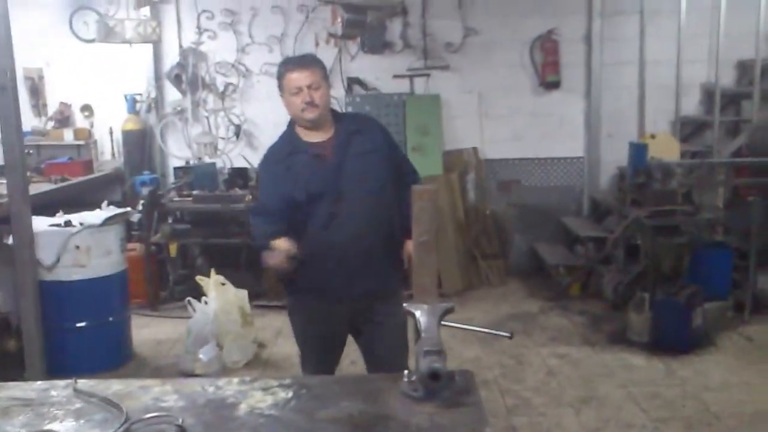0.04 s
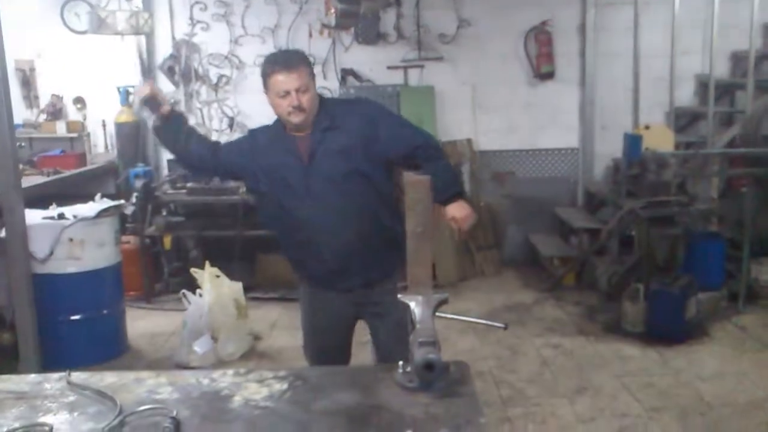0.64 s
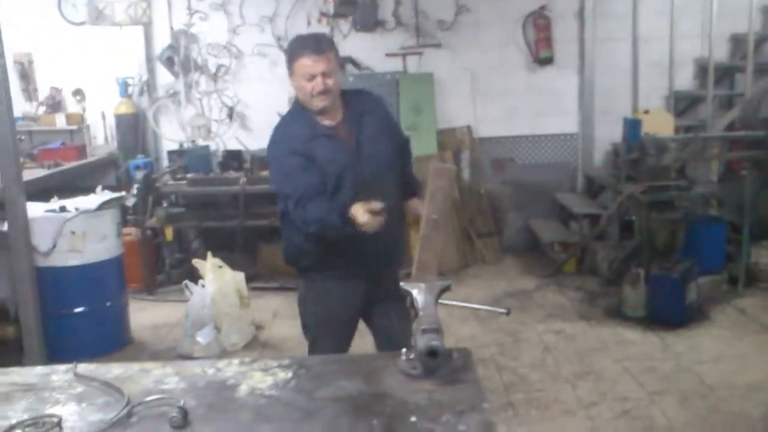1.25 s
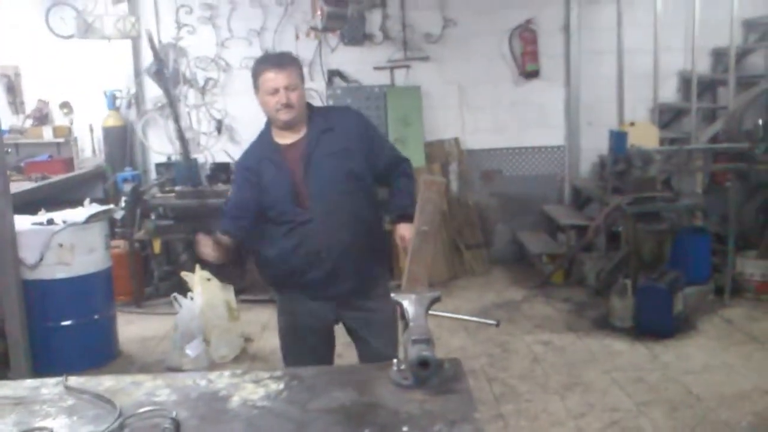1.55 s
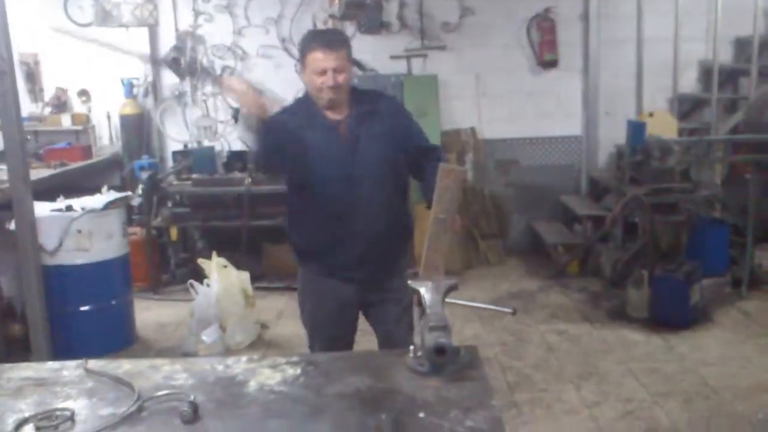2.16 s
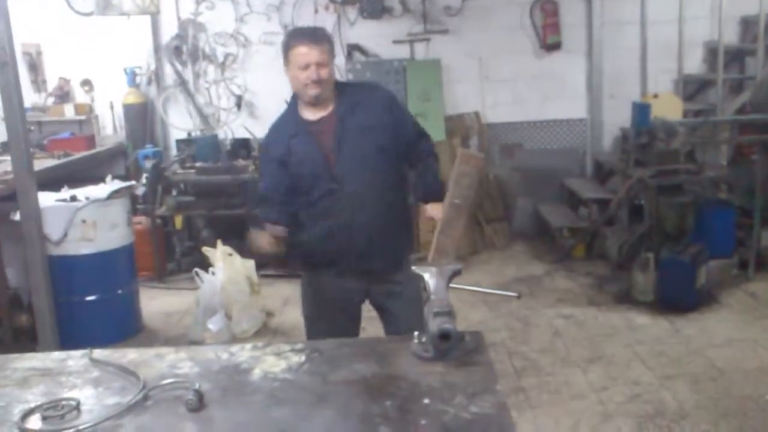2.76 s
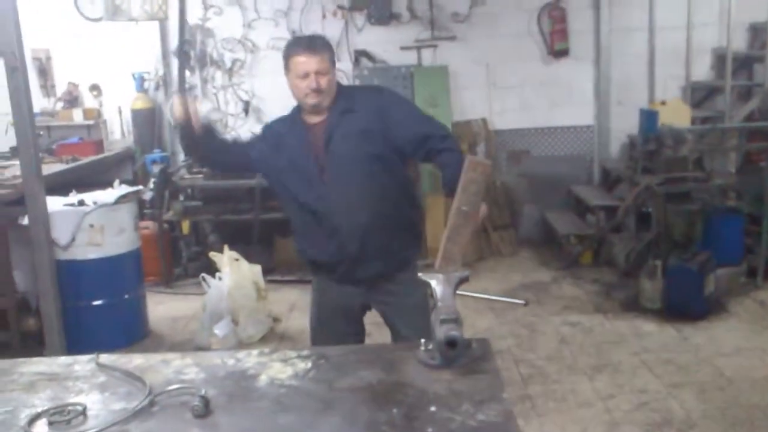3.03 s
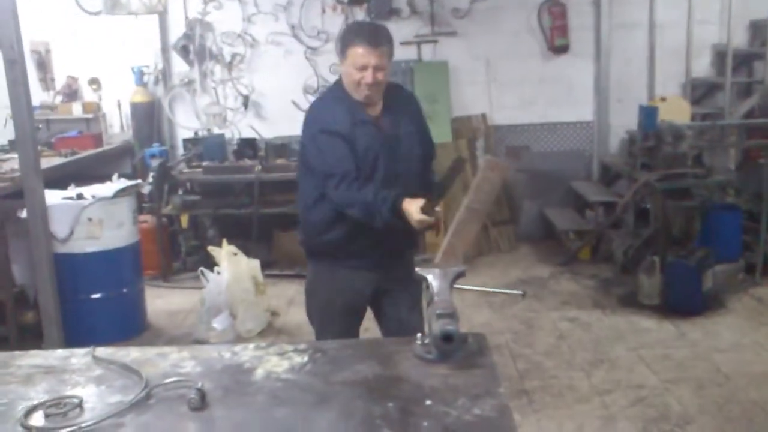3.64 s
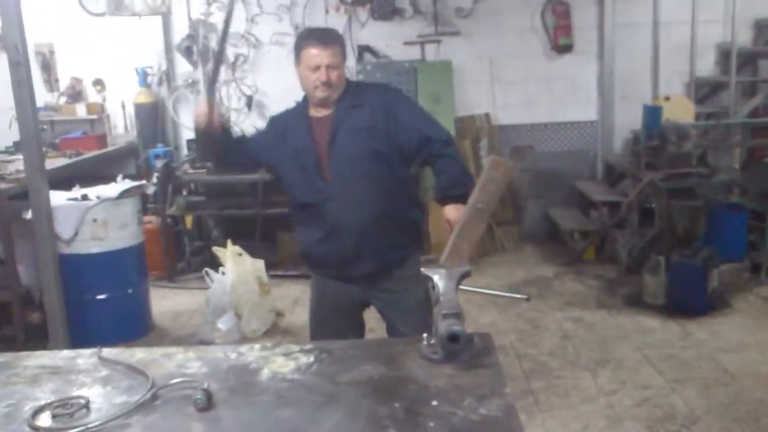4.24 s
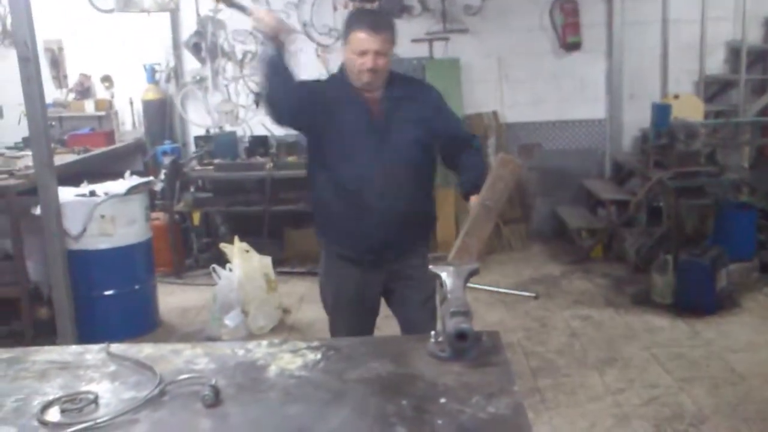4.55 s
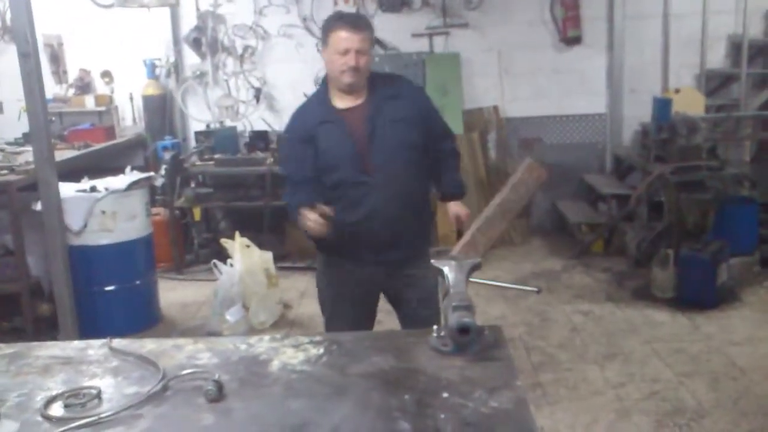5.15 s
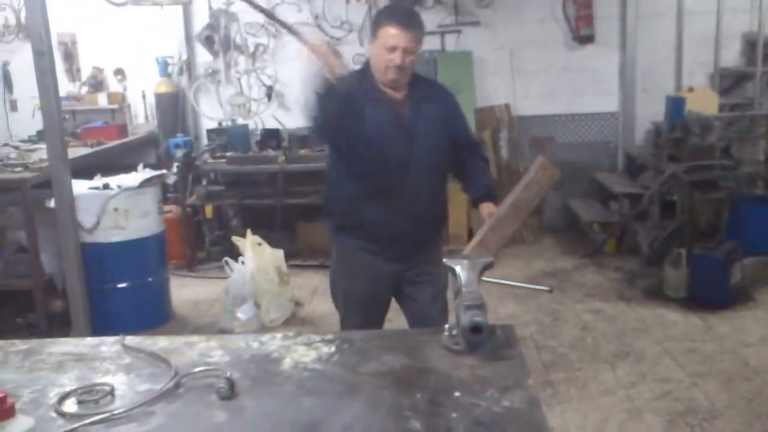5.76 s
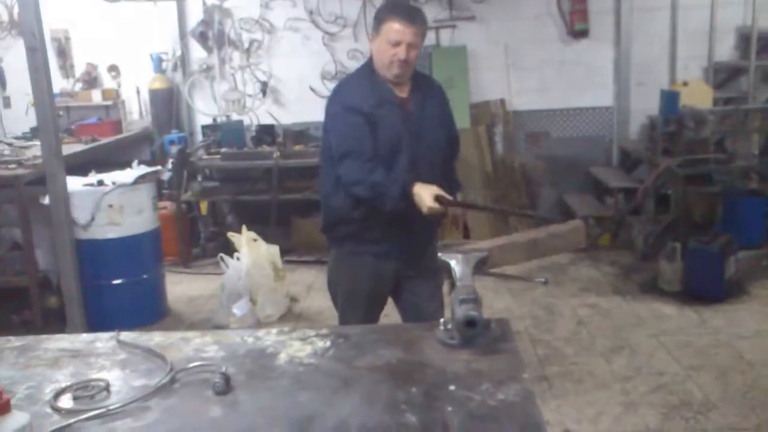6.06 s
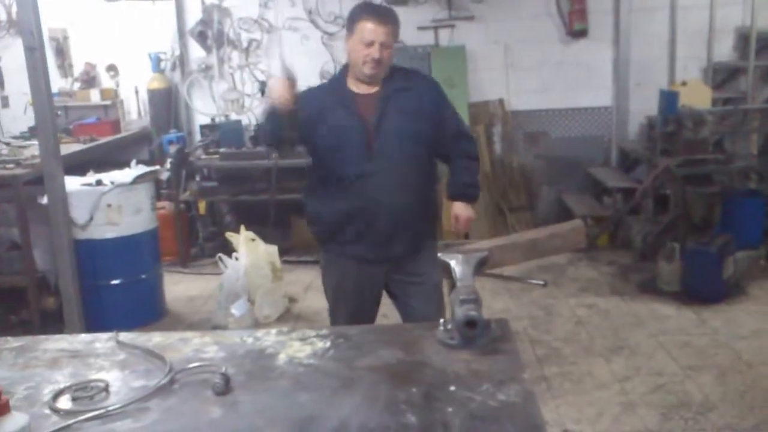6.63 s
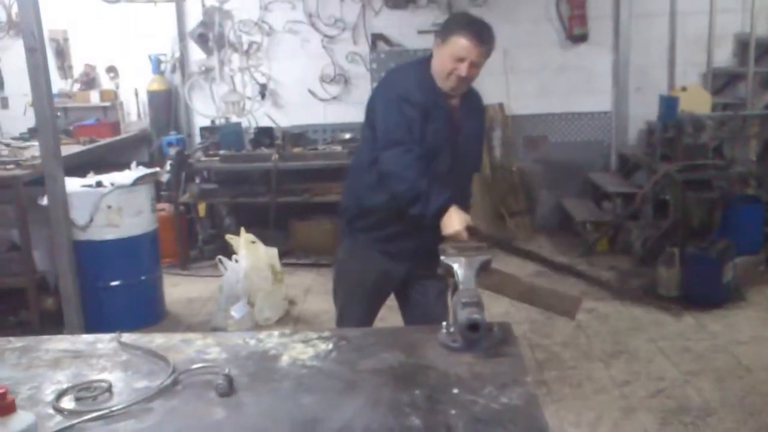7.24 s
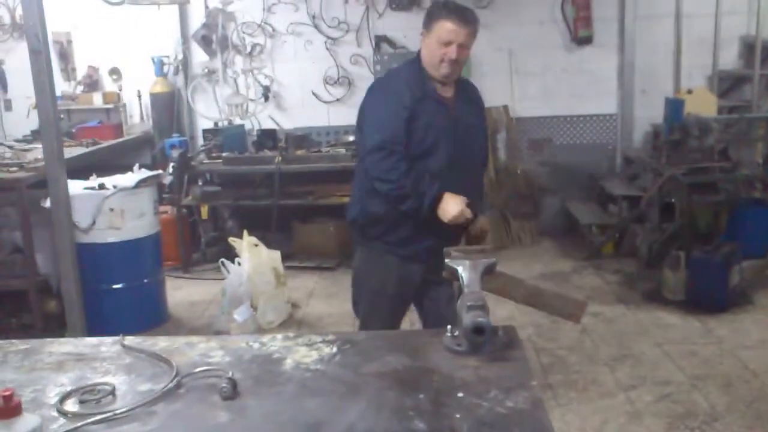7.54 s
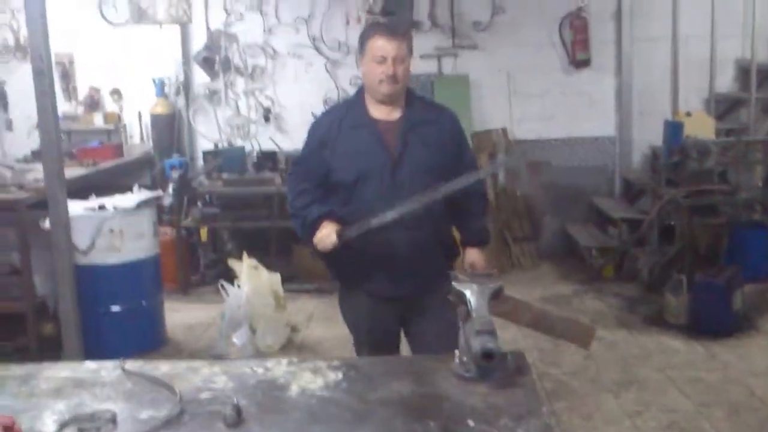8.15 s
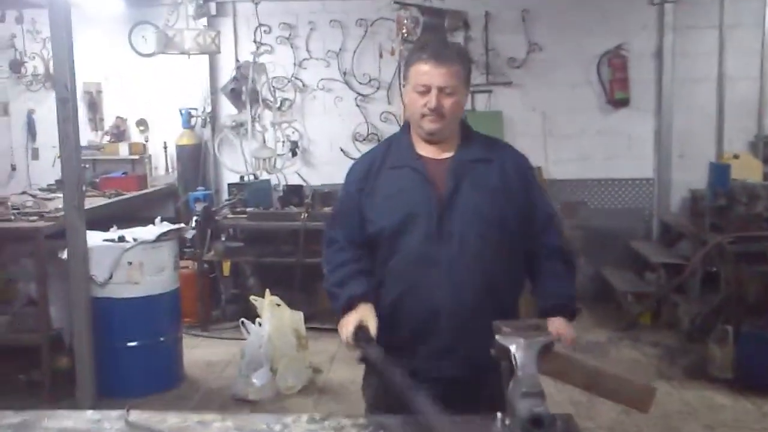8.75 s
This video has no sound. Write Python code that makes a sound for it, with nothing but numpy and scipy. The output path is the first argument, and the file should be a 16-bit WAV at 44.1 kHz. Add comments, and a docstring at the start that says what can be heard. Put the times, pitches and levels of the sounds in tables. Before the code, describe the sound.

A steel sword strikes a target in a bench vise six times, a little over a second apart. Each blow is a loud, distorted crack with a metallic clang, and a clear blade note rings on or is quickly damped. A sleeve rustles faintly before each swing, and two dull knocks follow the third hit. A machine hums throughout the echoing workshop, heard from some distance.

```python
"""A steel sword strikes a target in a bench vise six times, in a hard-walled workshop.
Each blow cracks and sets the steel ringing; one clear note of the blade sings on until it is damped.
A sleeve rustles before each swing, the sword knocks twice in the hand, and a machine hums throughout.
Two microphones stand 12.5 cm apart, far enough off that the room outweighs the direct sound.
They overload on every hit, then their gain control briefly holds the echo level."""
import sys
import numpy as np
from scipy import signal
from scipy.fft import rfft, irfft, next_fast_len
from scipy.io import wavfile
from scipy.ndimage import uniform_filter1d

SR = 44100
rng = np.random.default_rng(int(sys.argv[2]) if len(sys.argv) > 2 else 0)


def persist_wave(psi):
    """Save psi, clipped to +-1, as 16-bit WAV."""
    counts = np.round(np.clip(psi, -1, 1) * 32767).astype(np.int16)
    wavfile.write(sys.argv[1], SR, np.atleast_2d(counts).T)


N = 387771
TIME = np.arange(N) / SR
TAIL = TIME[:SR * 3 // 2]   # time axis of one blow or echo


def from_db(db):
    """Decibels to gain."""
    return 10 ** (np.asarray(db) / 20)


def rms_one(x):
    """Scale to rms 1."""
    return x / np.sqrt(np.mean(x ** 2) + 1e-20)


def at_hz(points, hz):
    """Read a table on a log-frequency axis."""
    freqs, values = np.transpose(points)
    return np.interp(np.log(np.maximum(hz, 1)), np.log(freqs), values)


def fade(t, t60):
    """Exponential decay, 60 dB down after t60."""
    return np.exp(-np.log(1000) * t / t60)


def add(out, start_s, sound):
    """Mix a sound in at its start time."""
    at = int(start_s * SR)
    out[:, at:at + sound.shape[-1]] += sound[..., :N - at]


def drift(rate_hz):
    """A random wander of rms 1."""
    knots = rng.standard_normal(4000)
    return rms_one(np.interp(TIME * rate_hz, np.arange(len(knots)), knots))


def causal(gain):
    """The minimum-phase pulse that has this gain at each frequency."""
    cepstrum = irfft(np.log(gain + 1e-9))
    cepstrum[1:len(cepstrum) // 2] *= 2
    cepstrum[len(cepstrum) // 2 + 1:] = 0
    return irfft(np.exp(rfft(cepstrum)))


def diffuse_spectrum(size, mic_spacing_m=0.125):
    """White noise from all sides, as a spectrum with its frequencies; long waves reach both mics alike."""
    hz = np.fft.rfftfreq(size, 1 / SR)
    wavelengths_apart = hz * mic_spacing_m / 343
    alike = np.sinc(2 * wavelengths_apart)
    mid, side = rfft(rng.standard_normal((2, size)))
    return (np.sqrt(1 + alike) * mid + np.sqrt(1 - alike) * side * [[1], [-1]]) / np.sqrt(2), hz


def diffuse_noise(colour):
    """Noise at the microphone pair, shaped by a spectrum table, at rms 1."""
    spectrum, hz = diffuse_spectrum(next_fast_len(N, True))
    return rms_one(irfft(spectrum * from_db(at_hz(colour, hz)))[:, :N])


# air all round the microphones: (frequency [Hz], relative density [dB])
AIR_SPECTRUM = [(15, -32.5), (25, -6.5), (90, -10), (163, -3), (293, -5.5), (354, -3.5), (462, -13),
                (529, -11), (673, -11.5), (729, -8.5), (2130, -14), (2850, -23.5), (5720, -30),
                (13800, -51), (15000, -76)]
# the machine's hum at the right microphone: (frequency [Hz], rms level [dB])
HUM_LINES = [(70, -59), (138, -55), (184, -55), (208, -58.5), (332, -55.5), (371.2, -54.5), (554.5, -61.5),
             (742.9, -62.5), (926, -70)]
def room_tone(air_db=-45.05, waver_db=1.5, wander_rad=0.91, left_db=-1.0):
    """Rushing air and the unsteady hum of a machine fill the workshop."""
    air = from_db(air_db) * diffuse_noise(AIR_SPECTRUM)
    hum = 0
    for hz, level_db in HUM_LINES:
        tone = np.sin(2 * np.pi * hz * TIME + wander_rad * drift(6.2))
        hum += from_db(level_db) * rms_one(tone * from_db(waver_db * drift(3.9)))
    return (air + hum) * from_db([[left_db], [0]])


# rubbing cloth, faint at the microphones: (frequency [Hz], relative density [dB])
CLOTH_SPECTRUM = [(800, -13), (2500, 3), (5000, 4.5), (9000, -7), (14500, -14), (16000, -35)]
def sleeve(lead_s=0.31, raise_s=0.44, raise_db=-63.5, flutter_db=2.0, flutter_hz=25):
    """Cloth rubs in a soft swell as the arm goes up for each blow, and as it is lowered at the end."""
    rub = diffuse_noise(CLOTH_SPECTRUM)
    moves = [(blow[0] - lead_s, raise_s, raise_db) for blow in SWORD_BLOWS]
    moves.append((8.49, 0.24, -57.5))   # lowering the sword
    swell = 0
    for peak_s, length_s, level_db in moves:
        swell += from_db(level_db) * np.cos(np.pi * np.clip((TIME - peak_s) / length_s, -.5, .5))
    return rub * swell * from_db(flutter_db * drift(flutter_hz))


# the crack at the point of contact: (frequency [Hz], relative density [dB])
CRACK_SPECTRUM = [(25, -11), (65, -0.5), (105, -8), (260, -5), (500, -7.5), (700, -6.5), (1050, -5.5),
                  (1500, 1.5), (2400, 0.5), (4500, 1), (7000, 1.5), (8200, -3), (11000, -8), (15500, -7)]
def crack(thud_db, bright_db, thud_hz=500, bright_hz=4500):
    """The contact pulse: the bench takes up the lows, a hard edge adds treble."""
    hz = np.fft.rfftfreq(len(TAIL), 1 / SR)
    plain = rms_one(from_db(at_hz(CRACK_SPECTRUM, hz)))
    bass_db = thud_db / (1 + (hz / thud_hz) ** 2)
    treble_db = bright_db * hz ** 2 / (hz ** 2 + bright_hz ** 2)
    return causal(plain * from_db(bass_db + treble_db))


# blade, target and vise ringing at the bench: (frequency [Hz], relative energy [dB], t60 [s])
STEEL_MODES = [(795, -26, .05), (1406, -14, .14), (1598, -33, 1.1), (1870, -12, .07), (1925, -9, .07),
               (1960, -11, .09), (2170, -20, .05), (2255, -17, .06), (2305, -14, .12), (2415, -16, .08),
               (2500, -20, .06), (2625, -15, .08), (2860, -23, .05), (3136, -17, .12), (3270, -20, .05),
               (3340, -18, .08), (3745, -20, .2), (3818, -18, .25), (4030, -24, .06), (4172, -21, .2),
               (4470, -22, .05), (4897, -20, .12), (5342, -18, .06), (5462, -18, .08), (5730, -17, .15),
               (6120, -22, .06), (6750, -19, .04), (6860, -21, .15), (9517, -36, .5), (10520, -35, .4)]
def clang(ring_db=-2.0, scatter_db=0.84):
    """Every blow rings the modes of the steel, each at a slightly different strength."""
    out = 0
    for hz, level_db, t60 in STEEL_MODES:
        mode = np.sin(2 * np.pi * (hz * TAIL + rng.random())) * fade(TAIL, t60)
        out += mode / np.linalg.norm(mode) * from_db(level_db + scatter_db * rng.standard_normal())
    return out * from_db(ring_db)


# groups of modes that a blow lifts or mutes, by its place along the edge:
# (centre [Hz], width [Hz], lift at place 0 [dB], lift at place 1 [dB], lift per extra force [dB/dB])
MODE_GROUPS = [(790, 180, -3.5, 4, -0.66), (1598, 50, 5, -6, -0.35), (1916, 160, 7, -1, -0.1),
               (2435, 390, 0, 7.5, -0.3), (3400, 340, 4.5, -1.6, -0.22)]
def point_of_impact(sound, place, extra_db, overtone_hz, overtone_db, overtone_width_hz=60):
    """Where the edge lands favours one overtone; place and force shift whole groups of modes."""
    hz = np.fft.rfftfreq(len(sound), 1 / SR)
    lift_db = overtone_db * np.exp(-((hz - overtone_hz) / overtone_width_hz) ** 2)
    for centre, width, first_db, last_db, per_force in MODE_GROUPS:
        group_db = first_db + (last_db - first_db) * place + per_force * extra_db
        lift_db += group_db * np.exp(-((hz - centre) / width) ** 2)
    return irfft(rfft(sound) * rfft(causal(from_db(lift_db))))


# the echo off the hard walls: (frequency [Hz], t60 [s])
ECHO_DECAY = [(60, 0.62), (250, 0.85), (1000, 0.65), (2500, 0.63), (5000, 0.58), (8000, 0.46),
              (11000, 0.38), (16000, 0.1)]
# its balance at the microphones: (frequency [Hz], left over right [dB])
ECHO_BALANCE = [(600, 0.8), (1300, -1.5), (2300, -1.2), (4400, 0), (8100, 4), (14000, 10.5)]
def workshop(sound, direct_db=18.0, early_db=6.0, early_t60=0.056):
    """Direct sound and bench echoes reach both microphones alike; the diffuse tail dulls as it dies."""
    noise = irfft(diffuse_spectrum(len(TAIL))[0], len(TAIL))
    hz, t, cells = signal.stft(noise, SR, nperseg=256)
    decay = fade(t, at_hz(ECHO_DECAY, hz)[:, None])
    sides = from_db(at_hz(ECHO_BALANCE, hz) * [[1], [-1]] / 2)
    tail = signal.istft(cells * decay * sides[..., None], SR)[1]
    early = from_db(early_db) * rng.standard_normal(len(TAIL)) * fade(TAIL, early_t60)
    early[0] += from_db(direct_db)
    return signal.fftconvolve(early + tail[:, :len(TAIL)], sound[None], axes=1)


# blows at the vise: (time [s], force [dB], brightness [dB], place on the edge [0-1], overtone [Hz],
# overtone lift [dB], clear note's level [dB], its left over right [dB], its free ringing [s])
SWORD_BLOWS = [(1.0205, 9, -4, 0.03, 3360, 3.5, -16.5, 0.5, 1.3),
               (2.3478, 2.5, 0, 0.65, 5760, 6, -23, -12, 2.6),
               (3.5712, 9.5, 3.8, 0.45, 3790, 4, -19.5, 4.5, 0.06),
               (4.7720, 9.5, 1.9, 0.6, 6820, 2, -11.5, -4, 0.038),
               (5.9422, 4.5, 4, 0.73, 5430, 9, -19, -2, 1.024),
               (7.1828, 8.5, -3.7, 0.84, 3770, 5.5, -16.5, -5, 0.27)]
def sword_blows(usual_force_db=7.5, usual_thud_db=-5, thud_per_force=-0.9):
    """Each blow cracks and clangs into the room; a harder one has a smaller share of bench thud."""
    out = np.zeros((2, N))
    for start_s, force_db, bright_db, place, overtone_hz, overtone_db, *_ in SWORD_BLOWS:
        extra_db = force_db - usual_force_db
        contact = crack(usual_thud_db + thud_per_force * extra_db, bright_db)
        blow = point_of_impact(contact + clang(), place, extra_db, overtone_hz, overtone_db)
        add(out, start_s, workshop(from_db(force_db) * blow))
    return out


def blade_note(hz=1289.3, build_s=0.0033, bloom_db=3, bloom_t60=0.91, free_t60=3.63,
               damped_t60=0.69, choke_t60=0.05, left_lag_rad=0.45, waver_db=0.37, waver_hz=2.8):
    """The clear note blooms, wavers as the sword moves, and rings until damped or choked by a blow."""
    out = np.zeros((2, N))
    ends = [blow[0] for blow in SWORD_BLOWS[1:]] + [N / SR]
    for (start, *_, level_db, pan_db, free_s), end in zip(SWORD_BLOWS, ends):
        t = TIME[:int((end - start + choke_t60) * SR)]
        tone = np.sin(2 * np.pi * hz * t - np.array([[left_lag_rad], [0]]))
        free_time = np.minimum(t, free_s)
        ringing = fade(free_time, free_t60) + from_db(bloom_db) * fade(free_time, bloom_t60)
        damping = fade(t - free_time, damped_t60)
        choke = fade(np.maximum(t - (end - start), 0), choke_t60)
        envelope = (1 - np.exp(-t / build_s)) * ringing * damping * choke
        add(out, start, tone * envelope * from_db(level_db + np.array([[pan_db], [-pan_db]]) / 2))
    return out * from_db(waver_db * np.array([drift(waver_hz), drift(waver_hz)]))


# light knocks between swings, before the room adds its echo: (time [s], level [dB])
HAND_KNOCKS = [(4.01, -52), (4.154, -47.5)]
def hand_knocks():
    """The sword knocks dully in the hand and the workshop answers."""
    out = np.zeros((2, N))
    knock = crack(thud_db=-0.5, bright_db=-14, bright_hz=9230)
    for start_s, level_db in HAND_KNOCKS:
        add(out, start_s, from_db(level_db) * workshop(knock, early_db=14, early_t60=0.032))
    return out


def scene():
    """The workshop as it reaches the microphone pair."""
    return room_tone() + sleeve() + sword_blows() + blade_note() + hand_knocks()


def gain_control(x, hold_db=-11.5, attack_s=0.035, release_s=0.027, hop=44):
    """The gain is pulled down, a little late, while the level stands above the held level."""
    power = uniform_filter1d(np.mean(x ** 2, axis=0), 8 * hop, origin=4 * hop - 1)[::hop]
    excess_db = np.maximum(10 * np.log10(np.abs(power) + 1e-12) - hold_db, 0)
    cut_db, cuts = 0., []
    for wanted_db in excess_db:
        lag_s = attack_s if wanted_db > cut_db else release_s
        cut_db += (wanted_db - cut_db) * hop / SR / lag_s
        cuts.append(cut_db)
    return x * from_db(-np.interp(TIME, TIME[::hop], cuts))


def record(dry, cutoff_hz=15700):
    """The microphone chain: gain control, hard overload, then a steep low-pass."""
    clipped = np.clip(gain_control(dry), -1, 1)
    lowpass = signal.ellip(10, .1, 70, cutoff_hz, fs=SR, output="sos")
    return signal.sosfilt(lowpass, clipped)


dry = scene()
out = record(dry)
persist_wave(out)
```